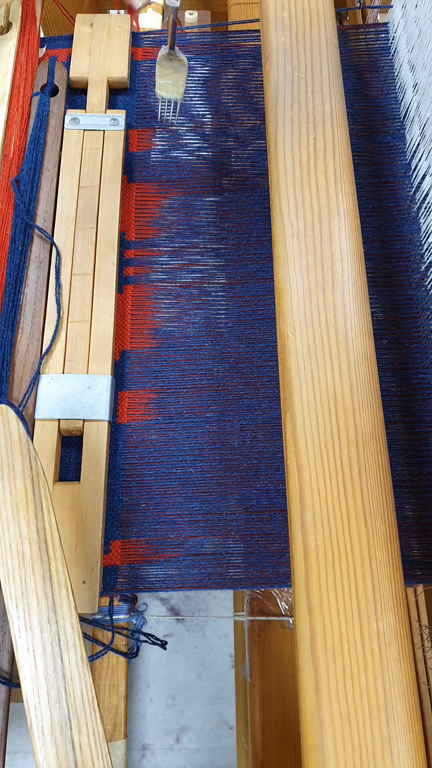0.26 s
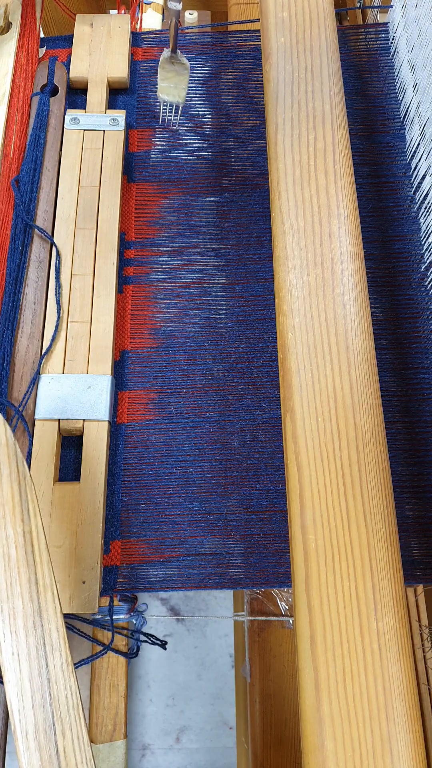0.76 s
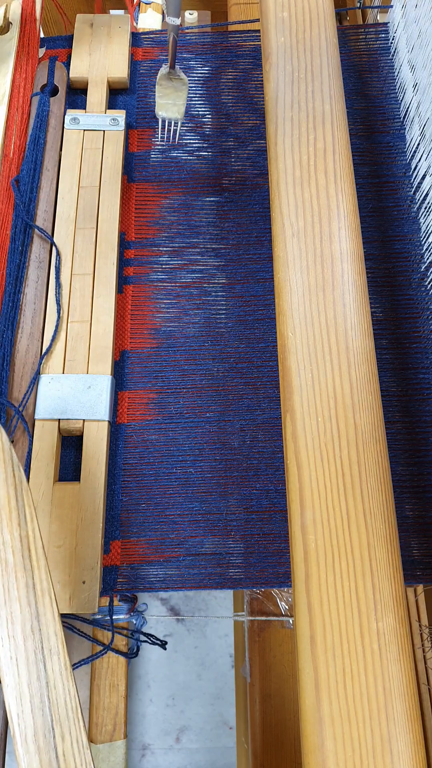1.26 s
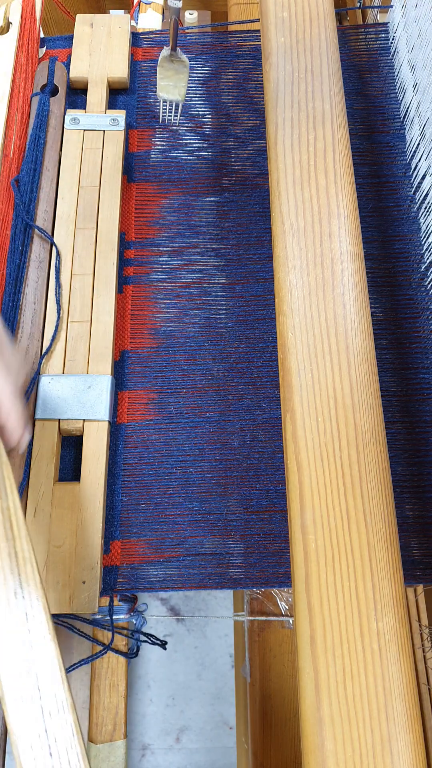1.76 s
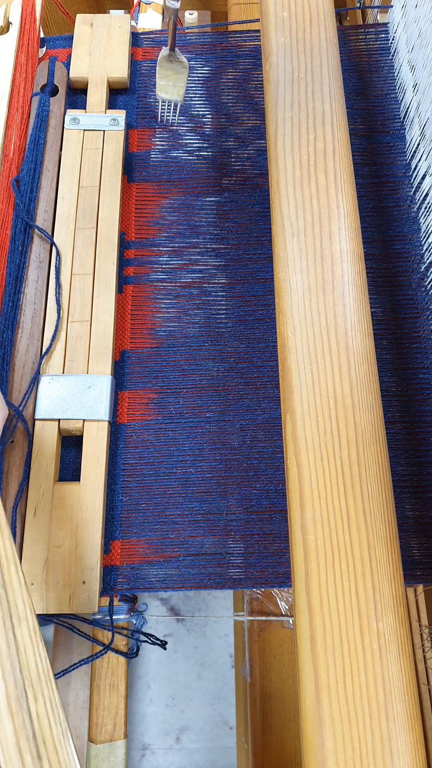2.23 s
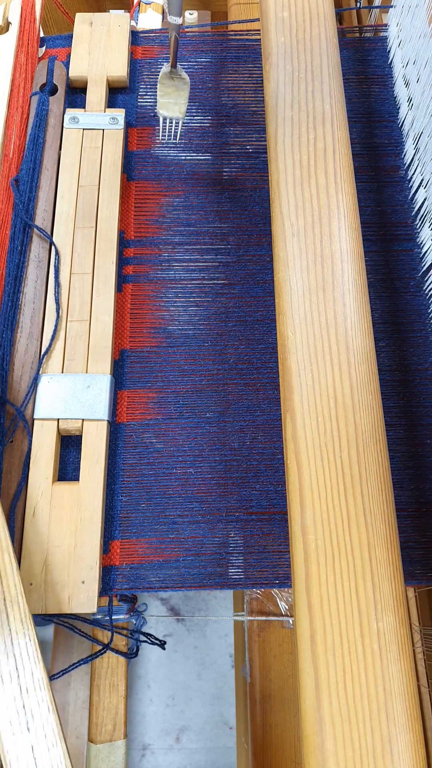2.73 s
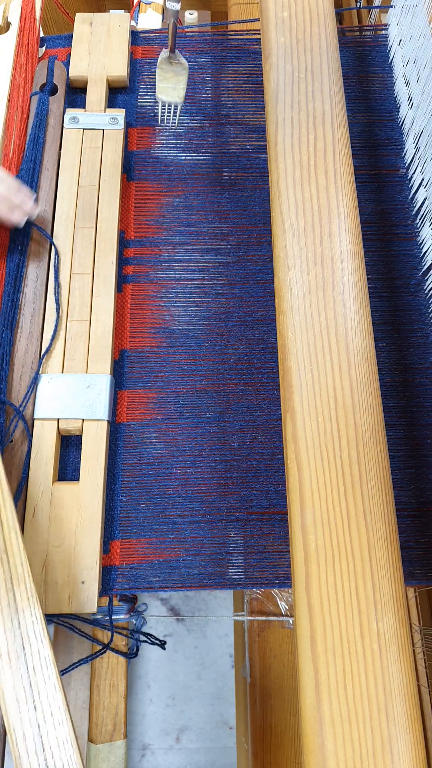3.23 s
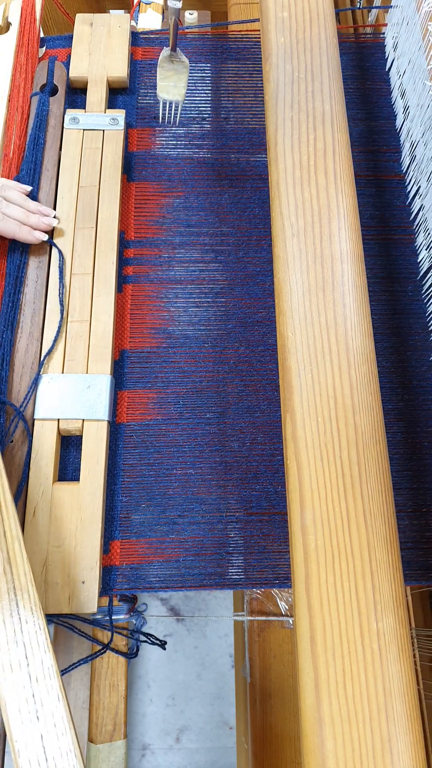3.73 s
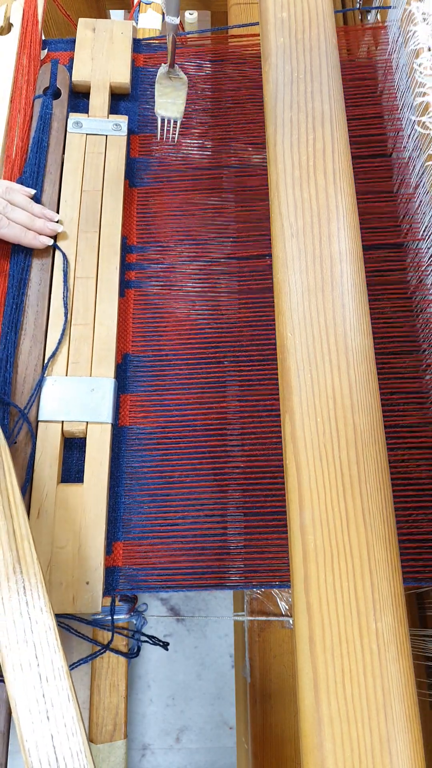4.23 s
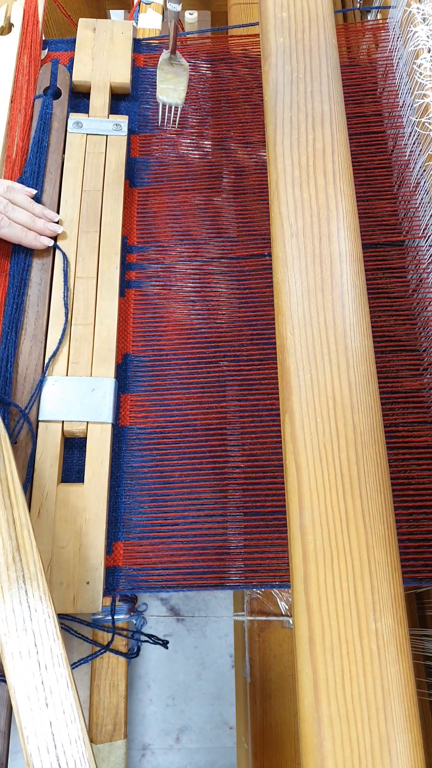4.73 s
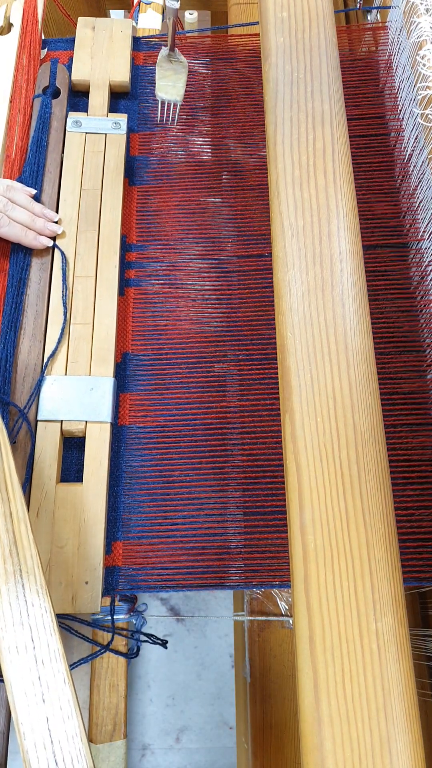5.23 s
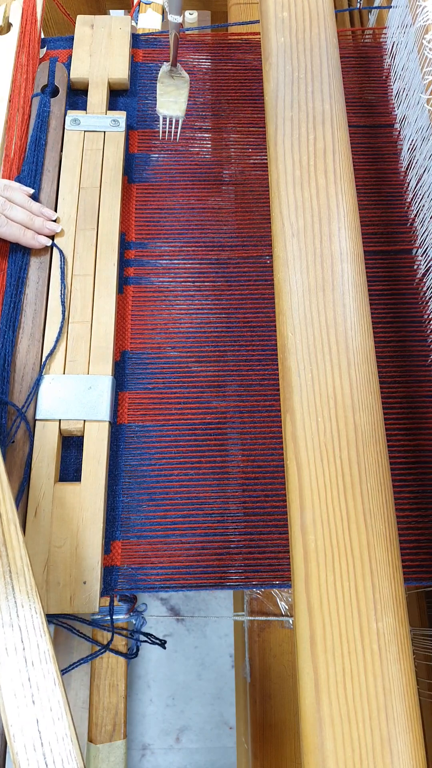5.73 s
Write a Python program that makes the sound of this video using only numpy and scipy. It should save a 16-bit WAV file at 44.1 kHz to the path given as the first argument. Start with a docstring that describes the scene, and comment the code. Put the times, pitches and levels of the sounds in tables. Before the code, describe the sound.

A wooden floor loom is worked by hand in a small, quiet room, heard close in stereo over very faint hiss and a low ventilation drone. Light, dull shuttle taps come at about 0.2 and 0.3 seconds, with barely audible sliding. At 1.65 a loud, solid wooden knock rings briefly with a soft low boom, followed by a smaller tap at 1.73. A faint squeak passes around 2.0; another knock falls at 2.25, then a tap and knock pair near 2.8. Yarn starts brushing, with tiny thread ticks, and more muted knocks land around 3.3. Rubbing grows from 3.6 into a grainy, raspy rush peaking near 4.25, with a short low throb that slows. Soft clacks from 4.6 lead to a hard, bright burst of shaft clatter at 5.05-5.15. A thin metallic ring lingers; small clacks follow near 5.5, then sharp, crisp snaps crowd around 5.8 over rustling threads.

```python
"""A wooden floor loom is worked by hand in a small, quiet room, heard close by in stereo.
Shuttles tap each other and knock on the frame: noise cracks plus ringing tones, then a low boom.
Yarn and warp threads rub and snap (many tiny noise grains), and the warp judders (a slowing throb).
At the end the shafts drop with a clatter and a metal part rings on."""
import sys
import numpy as np
from scipy import signal
from scipy.fft import rfft, irfft, next_fast_len
from scipy.io import wavfile
from scipy.ndimage import uniform_filter1d

SR = 44100
rng = np.random.default_rng(int(sys.argv[2]) if len(sys.argv) > 2 else 0)


def wav_out(sig):
    """Save sig, one row per channel (or a flat mono array), as 16-bit PCM at SR to the path in sys.argv[1]."""
    wavfile.write(sys.argv[1], SR, np.round(np.clip(np.atleast_2d(sig).T, -1, 1) * 32767).astype(np.int16))


N = 263718
TIME = np.arange(N) / SR  # the whole scene [s]
AGE = TIME[:26000]  # time since one blow [s]

# Levels in the event tables are starting points; each sound adds its own offsets.
# Wood put down on the frame: (time [s], level [dB], hardness [dB], left minus right [dB])
FRAME_KNOCKS = [(1.6566, -25.5, 2, -1.5), (1.8303, -54, -2, -1), (2.2574, -29.5, 0, -1.5),
                (2.8355, -36.5, -6, -1.5), (3.3736, -42.5, 1.5, -1.5)]
# Light taps of a shuttle: (time [s], level [dB], hardness [dB], left minus right [dB])
SHUTTLE_TAPS = [(0.1693, -44, -3, -1.5), (0.2966, -54, -30, 0), (0.7218, -69, -11, 0),
                (1.334, -76.5, -1, 2), (1.731, -35, 1.5, -3), (2.1761, -52.5, -2.5, 3),
                (2.1899, -57, 12.5, -4.5), (2.764, -31.5, 3, -2.5), (3.2885, -34, -4.5, -3),
                (4.4813, -65, -11.5, 0)]
# Shafts and treadles clatter: (time [s], level [dB], hardness [dB], left minus right [dB])
SHAFT_CLATTERS = [(4.6237, -41, -8, -0.5), (4.7587, -44, -8.5, 0), (4.8764, -45.5, -8, -1),
                  (5.0625, -28.5, 5.5, 0), (5.0675, -31.5, 5, 0.5), (5.0915, -41, 11, 1),
                  (5.1377, -30.5, 0, -1.5), (5.5142, -44, 1.5, 0), (5.5384, -41, -9, -1)]
# Threads snap free and heddles tick: (time [s], peak [dB], left minus right [dB])
THREAD_TICKS = [(2.8979, -36, -6), (2.9705, -32, 0), (3.1482, -42, -9.5), (3.6052, -34, -1),
                (3.7868, -32.5, 3.5), (4.0482, -36, 1), (4.2627, -28, 0), (5.3943, -35, -4.5),
                (5.441, -32.5, -1), (5.678, -32, -4), (5.7196, -28.5, -2.5), (5.7814, -19, -5),
                (5.7851, -18, -1), (5.8136, -27, -3), (5.8476, -23.5, 2.5), (5.86, -30, -2)]
# The metal part is set ringing: (time [s], level [dB])
METAL_PINGS = [(5.07, -71), (5.14, -50.5), (5.218, -47.5)]
# Further low booms of the frame, some under a knock or the clatter:
# (time [s], low tone [Hz], low tone level [dB], upper rumble level [dB])
FURTHER_BOOMS = [(1.826, 117, -65, -46.5), (3.039, 127.6, -60.5, -58.5), (4.791, 149.3, -58.5, -71),
                 (5.08, 227.2, -54, -46), (5.309, 177, -66, -45), (5.37, 90, -54, -51),
                 (5.55, 84.6, -64.5, -81), (5.77, 81.7, -64.5, -66)]
# Yarn and warp rub: a brief brush, weft drawn through, the shed changing, shafts rising, warp settling:
# (peak time [s], rise [s], fall [s], level [dB], brightness [dB])
RUB_STROKES = [(1.132, 0.054, 0.049, -65.5, 3), (2.439, 0.2, 0.064, -56.5, -8), (2.69, 0.3, 0.44, -52.5, 0),
               (2.97, 0.17, .5, -59.5, 5), (3.615, .11, 0.22, -46.5, -5), (4.0, 0.49, 0.59, -48.5, -1),
               (4.21, 0.11, 0.12, -40, 1), (4.268, 0.014, 0.032, -35, 4), (4.759, .018, 0.082, -48.5, 5.5),
               (4.835, 0.11, 0.1, -46.5, -18), (4.887, 0.046, 0.099, -43.5, 3.5),
               (5.27, 0.24, 0.32, -52, -1.5), (5.44, 0.07, 0.57, -51, -12), (5.523, 0.04, 0.062, -47, 11.5),
               (5.811, 0.15, 0.15, -49.5, 2)]
# A thread dragged over an edge: (peak time [s], rise [s], fall [s], level [dB])
EDGE_SCRAPES = [(3.688, .005, 0.082, -41.5), (4.925, 0.047, 0.034, -44.5)]
# Short dull scuffs around some of the wooden blows: (peak time [s], rise [s], fall [s], level [dB])
DULL_SCUFFS = [(2.729, .006, 0.12, -44), (3.24, .16, 0.24, -55.5), (4.623, 0.027, 0.014, -55.5),
               (5.059, 0.015, 0.024, -47.5)]
# A shuttle slides faintly over the threads: (peak time [s], rise [s], fall [s], level [dB])
SHUTTLE_SLIDES = [(0, .05, 0.075, -74), (.43, 0.18, 0.2, -69), (1.0, 0.88, .5, -85)]
# Wood squeaks faintly on wood: (peak time [s], rise [s], fall [s], level [dB], pitch [Hz])
WOOD_SQUEAKS = [(1.96, 0.017, .03, -72, 3010), (2.07, 0.055, 0.054, -67, 3015)]

# Ringing tones of the frame's beam: (pitch [Hz], level [dB], time to fall 60 dB [s])
BEAM_TONES = [(289, -11.5, 0.7), (375, -4.5, 0.87), (524.5, 8.5, 0.31), (649, 6, 0.32), (735, 0, 0.24),
              (823, 0.5, 0.14), (995, 0.5, 0.071), (1155, -0.5, 0.066), (1310, -1, 0.1), (1507, -2.5, 0.24),
              (1933, -11.5, 0.12), (2180, -11, 0.13), (2300, -23.5, 0.21), (2580, -7, 0.082),
              (3100, -20, .12)]
# Ringing tones of a shuttle: (pitch [Hz], level [dB], time to fall 60 dB [s])
SHUTTLE_TONES = [(294, -2, 0.37), (422, 3, 0.2), (681, -2, 0.22), (835, 2, 0.067), (1256, 4, 0.11),
                 (1200, 13, 0.083), (1570, -3.5, 0.19), (2060, -2.5, 0.16), (2500, -6, 0.13),
                 (2940, -23, 0.037), (3950, 13, 0.022), (4630, -14, 0.039), (5170, -11, .09),
                 (5720, -9, 0.08)]
# Ringing tones of the shafts: (pitch [Hz], level [dB], time to fall 60 dB [s])
SHAFT_TONES = [(598, -6.5, 0.42), (894, -7.5, 0.28), (1007, -1.5, 0.27), (1295, -9, 0.21),
               (1567, -14, 0.92), (1823, 4.5, 0.29), (1920, 8, 0.17), (2083, 6.5, 0.14), (2448, 5, 0.087),
               (2590, -9, 0.2), (2710, 2, 0.05), (2500, -29, 0.41), (3270, -16, 0.43), (3244, -0.5, 0.095),
               (3620, -32, 0.16), (4230, -32, 0.25)]
# Ringing tones of the metal part: (pitch [Hz], level [dB], time to fall 60 dB [s])
METAL_TONES = [(5010, -5, 0.64), (5040, -12, 0.8), (6440, -6.5, .65), (9200, 4, 0.16), (12700, -5, 0.21)]

# Tone colour of a crack on the beam: (frequency [Hz], level [dB])
BEAM_CRACK_COLOUR = [(59, -36), (100, -6.5), (231, -6), (359, 2.5), (452, -4), (524, 3), (720, -7),
                     (1120, -11.5), (1490, -11.5), (1660, -18.5), (1950, -11), (3000, -20.5), (4400, -28.5),
                     (7050, -35.5), (8200, -39.5), (10100, -61), (15000, -64.5)]
# Tone colour of a shuttle's crack: (frequency [Hz], level [dB])
SHUTTLE_CRACK_COLOUR = [(120, -42), (200, -13.5), (390, -0.5), (560, -15), (1050, -2), (1220, -10.5),
                        (1540, -4.5), (2020, -16.5), (2750, -18.5), (3010, -6.5), (3670, -10.5), (5860, -8),
                        (15000, -45)]
# Tone colour of the shafts' crack: (frequency [Hz], level [dB])
SHAFT_CRACK_COLOUR = [(88, -36), (150, -24.5), (601, -7.5), (998, -3), (1100, -11.5), (1310, 4), (1660, -6),
                      (1870, 4), (2700, -1.5), (4760, -23.5), (5790, -19), (7320, -32), (12200, -35),
                      (14500, -31), (16000, -35)]
# Tone colour of a tiny snap: (frequency [Hz], level [dB])
SNAP_COLOUR = [(410, -53), (700, -9), (910, -4), (1060, -6), (1330, 1.5), (1400, -1), (2530, 1), (3940, -6),
               (5760, -0.5), (8310, -10), (9600, -25.5), (13500, -15.5), (16000, -19)]
# Tone colour of rubbing threads: (frequency [Hz], level [dB])
THREAD_COLOUR = [(47, -69), (80, -7), (259, -4), (471, -2), (538, -3), (643, -3), (858, -5), (1000, -2.5),
                 (1490, -5.5), (1860, -7), (3960, -8), (9190, -29), (16000, -28)]
# Tone colour of the faint background hiss: (frequency [Hz], level [dB])
HISS_COLOUR = [(12, -29), (20, -25.5), (65, -6.5), (154, -21), (234, -18.5), (357, -34), (574, -30),
               (1060, -36.5), (1220, -36), (2080, -35.5), (2260, -39), (3070, -37), (4420, -44),
               (7400, -43.5), (9100, -62), (12300, -51.5), (16000, -57.5)]
# How long the room's echoes last: (frequency [Hz], time to fall 60 dB [s])
ROOM_DECAY = [(120, 0.47), (300, 0.4), (800, 0.34), (2000, 0.28), (5000, 0.32), (14000, 0.38)]

CLACK_SHARE = 0.55  # share of the hardness that reaches the clack register; the treble gets all of it
RASP_SHARE = 0.15  # share of the brightness that reaches the rasp; the hiss gets all of it
# Chance snags: how many, peak above the rubbing strength, scatter of size and of left minus right
SNAGS_PER_S, SNAG_DB, SNAG_SCATTER_DB, SNAG_PAN_DB = 14, 11.5, 2, 4.5
# The boom after every knock; both levels are relative to the knock
BOOM_DELAY_S, BOOM_HZ, BOOM_DB, BOOM_UPPER_DB = .035, 128.9, -20.5, -25.5
# The judder reaches full strength at JUDDER_S, holds, and fades
JUDDER_S, JUDDER_RISE_S, JUDDER_HOLD_S, JUDDER_FALL_S = 4.2, 0.069, .06, 0.15
SLIP_HZ, SLIP_SLOWING_PER_S = 97.6, 1.13  # middle of the wandering throb rate, and how fast it drops
# One rise or fall spans SWELL_DB; the power rounds the peak and steepens the ends
SWELL_DB, SWELL_POWER = 20, 1.6


def amp(db):
    """Turn decibels into a multiplier."""
    return 10 ** (np.asarray(db) / 20)


def unit(x, span=None):
    """Scale to an average strength (rms) of 1, judged over the first span seconds if given."""
    judged = x[..., :int(span * SR) if span else None]
    return x / np.sqrt(np.mean(judged ** 2) + 1e-24)


def fade(t60):
    """Die away after a blow, falling 60 dB in t60 seconds."""
    return np.exp(-np.log(1000) * AGE / max(t60, .001))


def band(x, lo_hz, hi_hz, order=3):
    """Keep only the frequencies between two limits."""
    limits = [lo_hz, min(hi_hz, SR / 2 - 1)]
    return signal.sosfilt(signal.butter(order, limits, "band", fs=SR, output="sos"), x + 1e-18)


def colour(x, points, size=2048):
    """Shape the tone through (Hz, dB) points with a filter that never sounds ahead of its input."""
    hz, db = np.transpose(points)
    grid_hz = np.linspace(1, SR / 2, size + 1)
    cepstrum = irfft(np.log(amp(np.interp(np.log(grid_hz), np.log(hz), db))))
    # folding the cepstrum forward makes the filter respond as early as it can
    cepstrum[1:size] *= 2
    cepstrum[size + 1:] = 0
    response = irfft(np.exp(rfft(cepstrum)))[:size]
    return signal.fftconvolve(np.atleast_2d(x), response[None], axes=1)[:, :x.shape[-1]]


def grains(count, spread_db):
    """Dense tiny contacts of uneven size, as noise with random loudness."""
    sizes = amp(spread_db * rng.standard_normal(count))
    return unit(rng.standard_normal(count) * sizes)


def walk(rate):
    """A smooth random wander with an rms of about 1, with about rate new values a second."""
    k = int(SR / rate)
    steps = np.repeat(rng.standard_normal(N // k + 1), k)
    return unit(uniform_filter1d(steps, k)[:N])


def swell(s, rise_s, fall_s, db, hold_s=0):
    """Loudness of one gesture: it rises to its peak at s, holds, and dies away."""
    before = np.maximum(s - TIME, 0) / max(rise_s, .002)
    after = np.maximum(TIME - s - hold_s, 0) / max(fall_s, .002)
    away = np.minimum(before + after, 4)
    return amp(db - SWELL_DB * away ** SWELL_POWER)


def together(swells):
    """Loudness of overlapping gestures: their powers add."""
    return np.sqrt(sum(g ** 2 for g in swells))


def ports(x, lag_ms):
    """Stereo from arrival times: left is later than right, or earlier if lag_ms is negative."""
    lags = np.maximum([lag_ms, -lag_ms], 0) / 1000
    count = next_fast_len(x.shape[-1] + 256)
    hz = np.fft.rfftfreq(count, 1 / SR)
    delay = np.exp(-2j * np.pi * hz * lags[:, None])
    return irfft(rfft(x, count) * delay, count)[:, :x.shape[-1]]


def add(out, s, x, pan_db=0):
    """Mix a sound in at time s; pan_db is left minus right."""
    i = max(int(s * SR), 0)
    sides = amp(np.array([[pan_db], [-pan_db]]) / 2)
    out[:, i:i + x.shape[-1]] += (x * sides)[:, :N - i]


def room_response():
    """Blurred echoes that build up quickly and die at a different pace in each frequency band."""
    hz, t60 = np.transpose(ROOM_DECAY)
    edges = np.geomspace(50, 20000, 9)
    tail = 0
    for lo, hi in zip(edges, edges[1:]):
        noise = band(rng.standard_normal((2, len(AGE))), lo, hi)
        tail = tail + noise * fade(np.interp(np.log(lo * hi) / 2, np.log(hz), t60))
    tail = tail * (1 - fade(0.0062))
    return tail / np.sqrt(np.sum(tail ** 2) / 2)


def in_room(x, room, lag_ms, wet_db):
    """The direct sound on both sides plus the room's answer."""
    echoes = signal.fftconvolve(x[None], room, axes=1)[:, :len(x)]
    return ports(x, lag_ms) + amp(wet_db) * echoes


def ring(modes, lag_ms, scatter_db=3.0, detune=0.0014, spread=1.0):
    """Fading tones of a struck object, with new strengths and left-right timing for every blow."""
    out = 0
    for hz, db, t60 in modes:
        size, shift, skew, start = rng.standard_normal(4)
        lead = 2 * np.pi * hz * lag_ms / 1000 + spread * skew  # the right side's head start [rad]
        phase = np.pi * start + np.array([[0], [lead]])
        tone = np.sin(2 * np.pi * hz * (1 + detune * shift) * AGE + phase)
        out = out + amp(db + scatter_db * size) * fade(t60) * tone
    return out * (1 - fade(0.0021))


def blows(rows, modes, tint, room, crack_s, grain_db, ring_db, wet_db, lag_ms,
          bass_db, body_db, clack_db, treble_db):
    """Wood on wood: a short crack fills the room while the wood rings; a harder contact is brighter."""
    out = np.zeros((2, N))
    attack = .02  # seconds used to judge the levels
    edges = 150, 700, 1700, 3500, 15000  # limits of bass, body, clack and treble [Hz]
    for s, db, hard_db, pan in rows:
        burst = grains(len(AGE), grain_db) * fade(crack_s)
        crack = colour(in_room(burst, room, lag_ms, wet_db), tint)
        hit = unit(crack, attack) + amp(ring_db) * unit(ring(modes, lag_ms), attack)
        # correct each register of the attack towards its wanted level
        start = hit[:, :int(attack * SR)]
        now = [20 * np.log10(band(start, lo, hi).std()) for lo, hi in zip(edges, edges[1:])]
        offsets = [bass_db, body_db, clack_db + CLACK_SHARE * hard_db, treble_db + hard_db]
        low, mid, upper, high = db + np.array(offsets) - now
        shape = [(520, low), (850, mid), (1400, mid), (2300, upper), (3300, upper), (4600, high)]
        add(out, s + .001, colour(hit, shape), pan)
    return out


def air(hum_hz=64, hum_db=-72, hiss_db=-68.5):
    """A low ventilation drone, the same on both sides, under a faint background hiss made of noise."""
    mid, side = rng.standard_normal((2, N))
    side = 0.29 * side + band(side, 280, 18000, order=1)
    hiss = unit(colour(np.array([mid + side, mid - side]), HISS_COLOUR))
    hum = amp(hum_db + 1.4 * walk(3.5)) * np.sin(2 * np.pi * hum_hz * TIME)
    return amp(hiss_db) * hiss + hum


def slide():
    """A smooth shuttle whispers over the threads: noise in two narrow bands."""
    noise = rng.standard_normal((2, N)) * amp(2 * walk(24.7))
    whisper = band(noise, 3010, 3250, order=2) + band(noise, 2000, 2140, order=2)
    return together(swell(*row) for row in SHUTTLE_SLIDES) * unit(whisper)


def taps(room):
    """A light shuttle is tapped: a very short crack and small, quickly fading tones."""
    return blows(SHUTTLE_TAPS, SHUTTLE_TONES, SHUTTLE_CRACK_COLOUR, room,
                 crack_s=0.016, grain_db=-3.5, ring_db=-2, wet_db=-7.5, lag_ms=0.4335,
                 bass_db=-11, body_db=-1, clack_db=-3.5, treble_db=-13)


def rubbing(room, grain_db=10, catch_db=2.5, wet_db=1, body_db=-1, rasp_db=-3.5, hiss_db=-14):
    """Threads catch and slip in countless tiny plucks; a brighter stroke rasps and hisses more."""
    strokes = [(swell(*stroke), bright_db) for *stroke, bright_db in RUB_STROKES]
    scuffs = [swell(*row) for row in DULL_SCUFFS]
    scrapes = [swell(*row) for row in EDGE_SCRAPES]
    body = together([g * amp(body_db) for g, _ in strokes] + scuffs)
    rasp = together([g * amp(rasp_db + RASP_SHARE * bright_db) for g, bright_db in strokes] + scrapes)
    hiss = together(g * amp(hiss_db + bright_db) for g, bright_db in strokes)
    contacts = np.clip(grains(N, grain_db), -18, 18)
    clumps = amp(catch_db * walk(70) + 1.5 * walk(22))  # uneven loudness from moment to moment
    plucks = colour(in_room(contacts * clumps, room, -.12, wet_db), THREAD_COLOUR)
    low = body * unit(band(plucks, 80, 3090))
    middle = rasp * unit(band(plucks, 2770, 7400))
    high = hiss * unit(band(plucks, 9700, SR / 2))
    return low + middle + high


def snags():
    """Chance snaps whose strength follows the rubbing at that moment: rows like THREAD_TICKS."""
    count = int(SNAGS_PER_S * N / SR)
    effort = together(swell(*stroke) for *stroke, _ in RUB_STROKES)
    rows = []
    for i in rng.integers(0, N, count):
        size, side = rng.standard_normal(2)
        peak = 20 * np.log10(effort[i]) + SNAG_DB + SNAG_SCATTER_DB * size
        rows.append((i / SR, peak, SNAG_PAN_DB * side))
    return rows


def ticks(room, wet_db=-2, gain_db=-1, lag_ms=0.372, crack_s=.016):
    """Threads snap free and heddles tick: tiny bright bursts of grains."""
    out = np.zeros((2, N))
    for s, peak, pan in [*THREAD_TICKS, *snags()]:
        burst = grains(len(AGE), 6.6) * fade(crack_s)
        snap = colour(in_room(burst, room, lag_ms, wet_db), SNAP_COLOUR)
        add(out, s + .001, snap * amp(peak + gain_db) / np.abs(snap).max(), pan)
    return out


def knocks(room):
    """Wood is put down on the frame: a crack and the tones of the beam."""
    return blows(FRAME_KNOCKS, BEAM_TONES, BEAM_CRACK_COLOUR, room,
                 crack_s=0.023, grain_db=4.5, ring_db=-0.5, wet_db=2.5, lag_ms=0.45,
                 bass_db=-5.5, body_db=0.5, clack_db=-10.0, treble_db=-23.5)


def booms(rise_s=0.052, upper_rise_s=0.032):
    """The frame's low tones swell slowly and linger, after each knock and at further moments."""
    out = np.zeros((2, N))
    low_swell, upper_swell = ((AGE / r) ** 2 * np.exp(2 - 2 * AGE / r) for r in (rise_s, upper_rise_s))
    knocked = [(s + BOOM_DELAY_S, BOOM_HZ, db + BOOM_DB, db + BOOM_UPPER_DB)
               for s, db, _, _ in FRAME_KNOCKS]
    for s, hz, low_db, upper_db in [*knocked, *FURTHER_BOOMS]:
        murmur = unit(band(rng.standard_normal(len(AGE)), 0.69 * hz, 0.96 * hz))
        low = np.sqrt(2) * np.sin(2 * np.pi * hz * AGE) + .5 * murmur
        noise = rng.standard_normal((3, len(AGE)))  # one shared, two for the separate sides
        upper = unit(band(ports(noise[0], 0.52) + 0.41 * noise[1:], 180, 630))
        add(out, s, amp(low_db) * low * low_swell + amp(upper_db) * upper * upper_swell)
    return out


def squeak(wobble=0.0044):
    """Wood rubs on wood: a thin friction tone with an unsteady pitch."""
    turns = 2 * np.pi * np.cumsum(1 + wobble * walk(150)) / SR
    return sum(swell(*gesture) * np.sin(hz * turns) for *gesture, hz in WOOD_SQUEAKS)


def judder(wander=0.104, drone_db=-36, rumble_db=-35.5):
    """The warp's layers pass and slip, throbbing like a slack drum skin; the slip slows as tension eases."""
    strength = swell(JUDDER_S, JUDDER_RISE_S, JUDDER_FALL_S, 0, JUDDER_HOLD_S)
    slip_hz = SLIP_HZ * np.exp(-SLIP_SLOWING_PER_S * np.maximum(TIME - JUDDER_S, 0))
    phase = 2 * np.pi * np.cumsum(slip_hz * (1 + wander * walk(60))) / SR
    throb = unit(np.sin(phase) + .5 * unit(band(rng.standard_normal(N), 101, 148)))
    noise = rng.standard_normal(N) + 0.84 * rng.standard_normal((2, N))
    rough = unit(colour(noise, [(110, -22), (180, -4), (300, -6), (500, -14), (900, -19), (2000, -56.0)]))
    rumble = rough * (1 + 0.19 * np.cos(phase))  # the rumble pulses with the throb
    return strength * (amp(drone_db) * throb + amp(rumble_db) * rumble)


def clatter(room):
    """Shafts and treadles clatter: longer cracks with many wooden tones."""
    return blows(SHAFT_CLATTERS, SHAFT_TONES, SHAFT_CRACK_COLOUR, room,
                 crack_s=0.06, grain_db=5.0, ring_db=-1.5, wet_db=5.5, lag_ms=-0.27,
                 bass_db=-5, body_db=1.0, clack_db=4.5, treble_db=-11.5)


def pings():
    """A small metal part sings on after the shafts land: high tones with a softened start."""
    out = np.zeros((2, N))
    for s, db in METAL_PINGS:
        tone = ring(METAL_TONES, -.19, scatter_db=1, detune=.0003, spread=.3)
        add(out, s, amp(db) * tone * (1 - fade(.06)))
    return out


def scene():
    """All parts of the loom in one room."""
    room = room_response()
    background = air() + slide()
    threads = rubbing(room) + ticks(room) + judder()
    wood = taps(room) + knocks(room) + booms() + squeak() + clatter(room)
    return background + threads + wood + pings()


def record(dry):
    """The recorder cuts the very top of the treble, above 15.9 kHz."""
    return signal.sosfilt(signal.ellip(10, .2, 70, 15900, fs=SR, output="sos"), dry)


dry = scene()
out = record(dry)
wav_out(out)
```